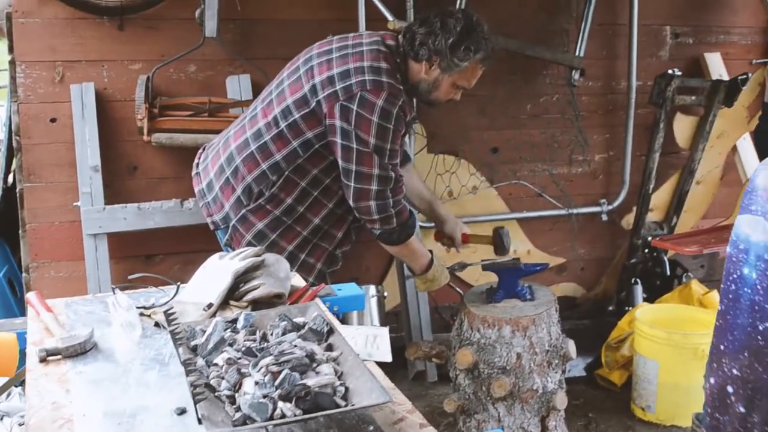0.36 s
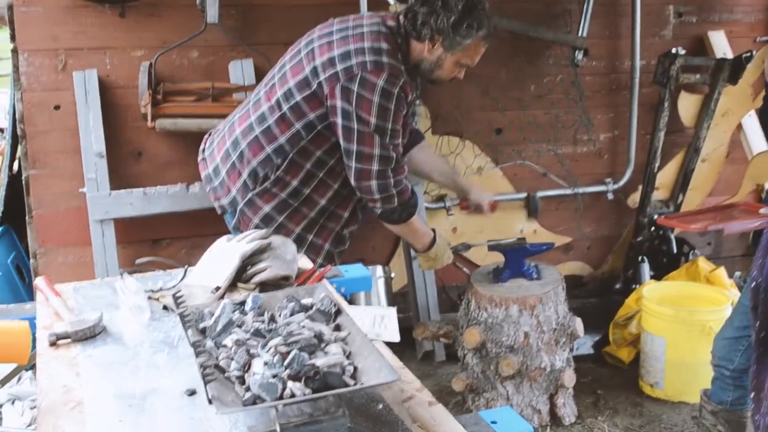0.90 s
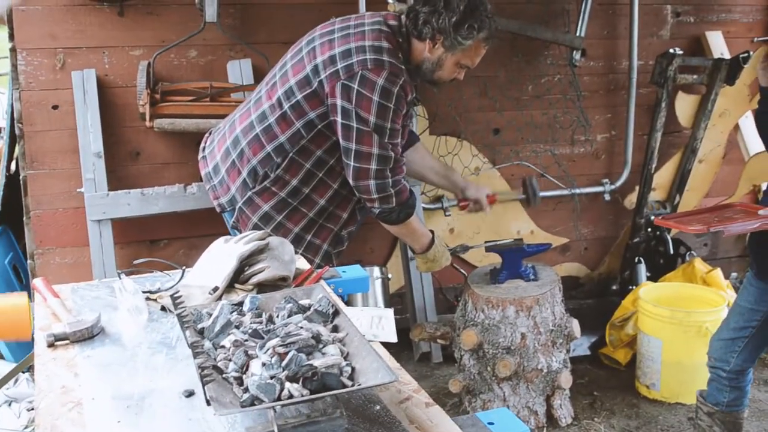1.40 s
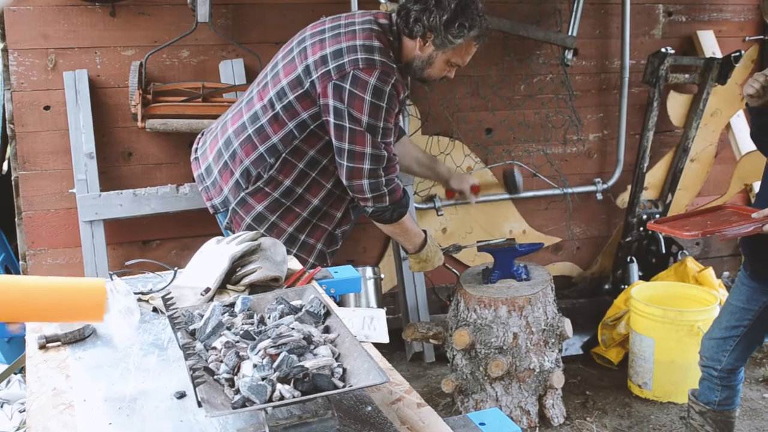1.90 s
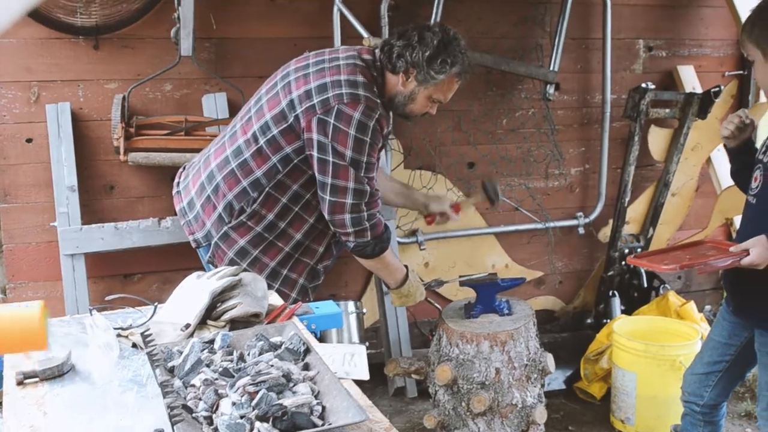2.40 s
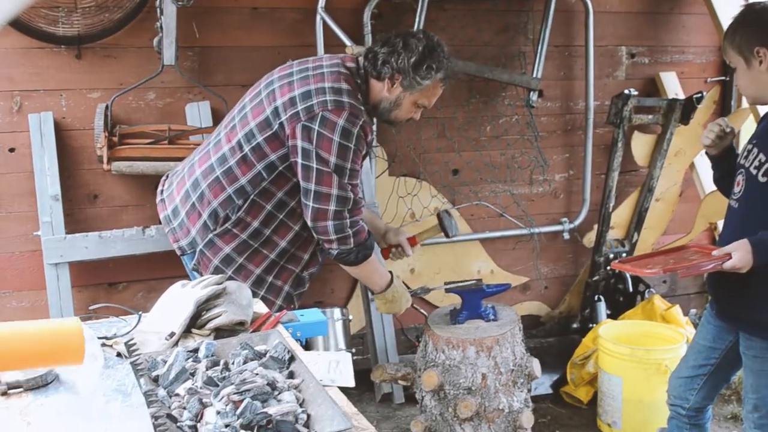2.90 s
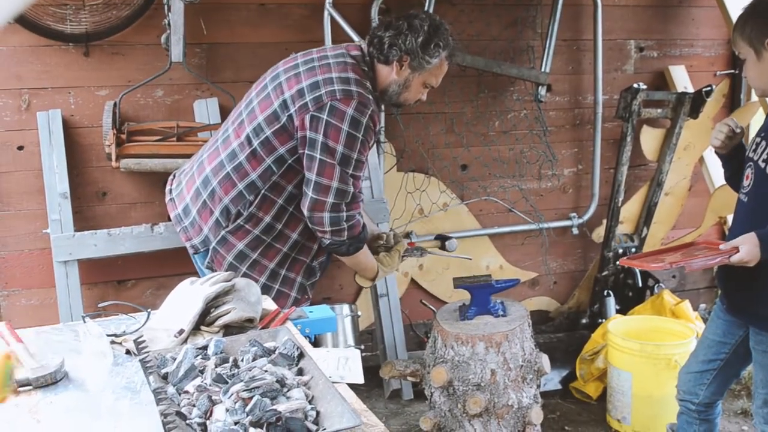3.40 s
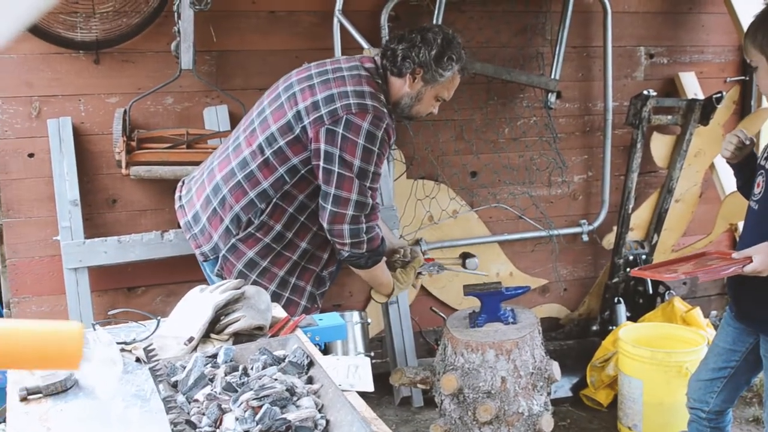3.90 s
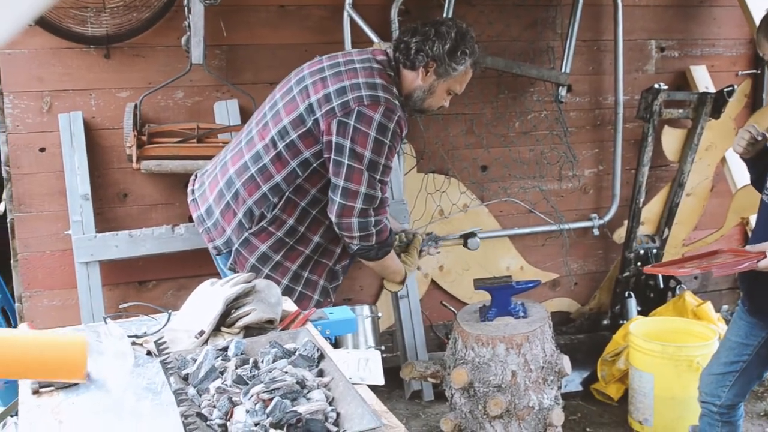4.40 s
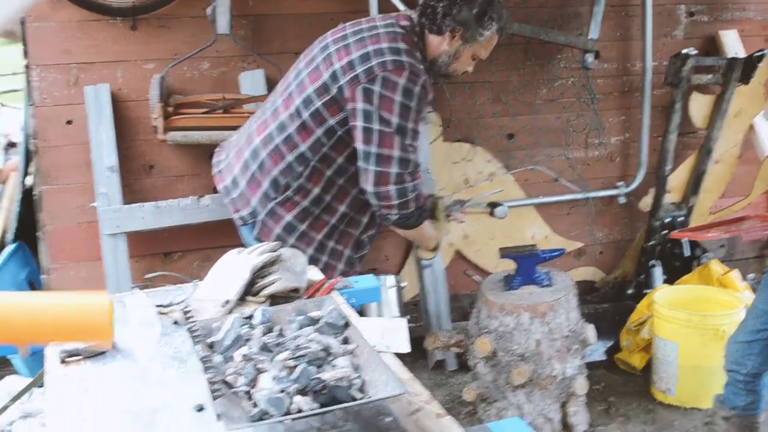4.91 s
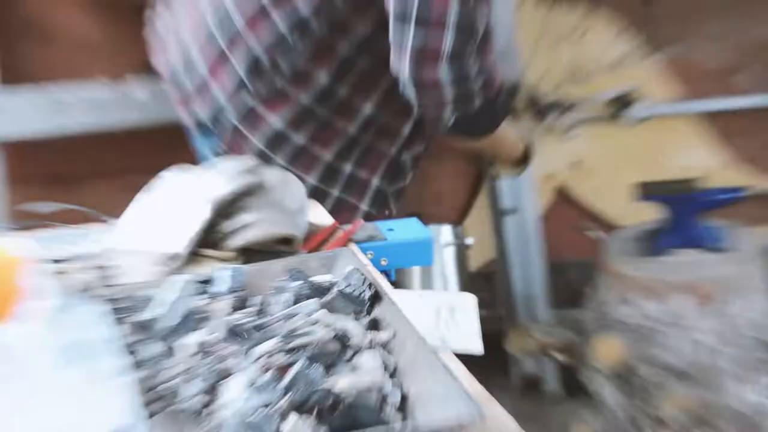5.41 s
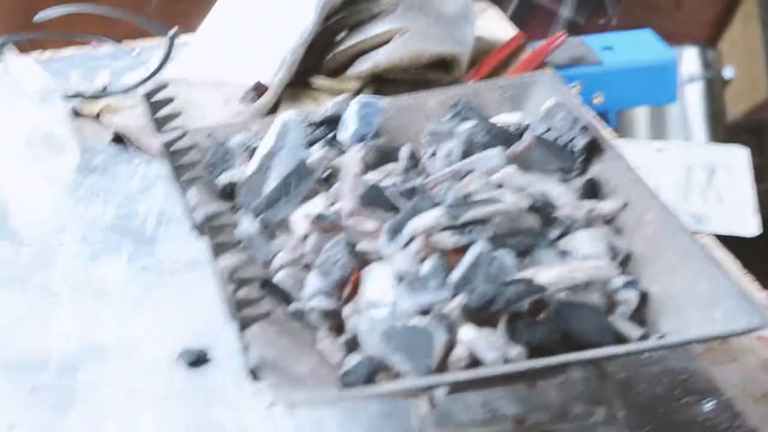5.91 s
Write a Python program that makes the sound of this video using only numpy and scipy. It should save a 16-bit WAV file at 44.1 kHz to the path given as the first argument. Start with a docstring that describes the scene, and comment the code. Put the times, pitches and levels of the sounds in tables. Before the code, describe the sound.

A hand hammer rings hard on a small anvil outdoors, seven steady blows, then hand sawing rasps on with loose wooden board knocks.

```python
"""A hand hammer strikes hot steel on a small anvil on a stump, seven blows from just before the start to 2.7 s:
each is a noise crack over damped modes and a thin wavering ring, and overload is clipped flat.
From the start, near walls scatter the tool sounds, a far building echoes late, and filtered noise makes a faint yard.
From 1.2 s a board knocks with thud, plank note and dry click, its modes shaken by noisy rebounds.
From 1.6 s to the end someone nearby saws it by hand: random tooth clicks and noise give rasp and hiss."""
import sys
import numpy as np
from scipy import signal
from scipy.fft import rfft, irfft
from scipy.io import wavfile
from scipy.ndimage import uniform_filter1d

SR = 44100
rng = np.random.default_rng(int(sys.argv[2]) if len(sys.argv) > 2 else 0)


def digitize_waveform(pressure):
    """Quantize a signal to 16-bit integers and store it at the path in sys.argv[1].

    Rows of a 2-D input are taken as channels; values are limited to [-1, 1].
    """
    field = np.atleast_2d(pressure).T
    bounded = np.clip(field, -1, 1)
    quanta = np.round(bounded * 32767).astype(np.int16)
    wavfile.write(sys.argv[1], SR, quanta)


def invert_db(level):
    """Linear amplitude ratio for a level in decibels (20 dB per decade), elementwise."""
    return 10 ** (np.asarray(level, dtype=float) / 20)


N = 266805  # samples

# Levels in the tables are relative within each layer unless noted.
# Hammer blows; the lowest anvil mode depends on where the face is struck:
# [t/s, force level/dB, crack brightness level/dB, anvil ring level/dB, lowest ring mode level/dB]
HAMMER_BLOWS = [(-.07, 7, -0.5, 1.5, 7.5), (0.4014, 7.5, -1.5, -5, 5), (0.8736, 8, -0.5, -4, -3.5),
                (1.3479, 3.5, 3.5, 6.5, -2), (1.804, 7, 1, -1, -2.5), (2.278, 4.5, 0, 5.5, -13),
                (2.7458, 5.5, -0.5, -4, -8)]
# Steel, stump and hammer, quickly damped modes: [f/Hz, level/dB, t60/s]
BODY_MODES = [(270.7, -21, 0.23), (406, -23, 0.38), (502, -10.5, 0.058), (605, -3.5, 0.037),
              (769.6, -4, 0.047), (900, -4, 0.043), (1059, 1.5, 0.041), (1250, -1, 0.0093), (1237, -9, 0.1),
              (1440, 5, 0.032), (1700, 2.5, 0.035), (1706, -11, 0.017), (1810, -12.5, 0.034),
              (1882, 6.5, 0.037), (1987, -6, 0.025), (2360, -5, 0.03), (2360, 4, 0.015),
              (2625, -14.5, 0.019), (3100, -9.5, 0.01), (3200, -12.5, 0.01)]
# The anvil's own thin ring: [f/Hz, level/dB, t60/s]
ANVIL_MODES = [(4730, -51, 0.79), (5040, -39, 0.27), (5170, -47, 0.28), (6300, -49.5, 0.3),
               (6660, -49, 0.43), (8330, -40.5, 0.15)]

# Near-wall and yard echoes, fading by band: [f/Hz, near level/dB, near t60/s, yard level/dB, yard t60/s]
ECHO_BANDS = [(190, -18.5, 0.55, -24.5, 1.17), (480, -11.5, 0.28, -31.5, 0.62),
              (1000, -17.5, 0.24, -36.5, 0.66), (2025, -13, 0.18, -42, 0.91),
              (4000, -13.5, 0.13, -37.5, 0.87), (7900, -20.5, 0.16, -32.5, 0.14),
              (14000, -21.5, .08, -49, .2)]
NEAR_END_S = 0.089  # the last near wall
FAR_ECHO_S, FAR_ECHO_DB = 0.19, 4  # centre and height of the swell in the yard tail
LOW_CUT_HZ = 196  # bass limit of the tools

# Spectrum of the distant outdoor noise: [f/Hz, level per Hz/dB]
YARD_SPECTRUM = [(100, -69), (170, -0.5), (218, -8), (486, 8), (991, 7.5), (1600, 11.5), (4350, -10.5),
                 (4750, -17.5), (5580, -12), (12000, -16.5), (15600, -52), (22000, -120)]
YARD_DB = -51.5  # rms before its slow swells
# Low rumble over time: [t/s, wind on the microphone level/dB, low thump remnant level/dB]
RUMBLE_LEVELS = [(0.0, -58, -45.5), (.37, -53, -58.5), (2.4, -56, -53.5), (3.12, -55, -55.5),
                 (3.5, -64, -67.5), (4.2, -59, -59.5), (4.6, -62, -69), (5.0, -49.5, -64), (5.6, -52, -62),
                 (6.05, -62, -60.5)]

# Board jolts: [t/s, plank level/dB, thud level/dB, click level/dB, rattle t60/s (held to 0.01-0.2)]
BOARD_KNOCKS = [(1.185, -56, -17, -60, .03), (1.655, -27.5, -41, -39, 0.038),
                (1.733, -24.5, -11, -42, 0.026), (1.88, 1, -3, -6.5, 0.028), (2.064, -21, -45, -31, 0.017),
                (2.113, -17.5, -13.5, -19, 0.04), (2.154, -45, -50, -24, .03), (2.242, 4, -26, -4.5, 0.038),
                (2.561, -1, -52, 2, 0.011), (2.977, -7.5, -50, -20, 0.044), (3.251, -40, -46, -26, 0.064),
                (3.341, -23, -23.5, -40, 0.014), (3.856, -45, -23, -34, .034),
                (3.899, -27, -10.5, -32, 0.036), (3.945, -50, -52, -23, 0.024),
                (4.192, -15.5, -9, -16.5, 0.089), (4.251, -14.5, -8, -18.5, 0.038),
                (4.395, -11.5, -59, -9.5, 0.038), (4.551, -20, -9.5, -28, 0.037),
                (4.591, -43, -14.5, -50, .036), (4.64, -56, -52, -23, 0.033),
                (4.855, -7.5, -33, -15.5, 0.046), (4.891, -26, -47, -36, 0.025),
                (4.923, -62, -18.5, -50, 0.033), (5.228, -21.5, -19, -30, 0.062),
                (5.271, -16, -11.5, -29, 0.017), (5.286, -42, -38, -15.5, 0.19),
                (5.528, -63, -26.5, -55, 0.034), (5.84, -45, -28, -50, 0.04),
                (5.867, -26.5, -20, -29, 0.027), (5.986, -50, -27, -52, .03)]
# Low board modes in the thud: [f/Hz, level/dB, t60/s]
THUD_MODES = [(173, -2, 0.021), (219, 7, 0.015), (310, -7, 0.0033)]
# Board modes in the plank note: [f/Hz, level/dB, t60/s]
PLANK_MODES = [(560, -30.5, 0.021), (670, 2, .03), (704, -0.5, 0.024), (816, 14, 0.021)]
# Board modes in the dry click: [f/Hz, level/dB, t60/s]
CLICK_MODES = [(1114, 7, 0.039), (1300, 11, 0.018), (1605, 17.5, 0.016), (1964, -4.5, .015),
               (2660, 4.5, 0.024), (3075, -8, 0.011), (3700, -51, 0.0049), (6600, -6, 0.0034),
               (11000, -11, 0.0036)]

# Saw strokes, each lasting until the next turn:
# [turn t/s, share of speed left at the turn (0-1, at least 0.02), fastest t/s, hiss level/dB, rasp level/dB]
SAW_STROKES = [(1.6, 0, 1.62, -63, -43.5), (1.7, 0.02, 1.81, -53, -29.5), (1.939, 0.24, 2.025, -47.5, -31),
               (2.102, 0.18, 2.195, -45.5, -27), (2.262, 0.5, 2.367, -52.5, -32.5),
               (2.453, 0.13, 2.523, -44.5, -25.5), (2.623, 0.05, 2.74, -53, -28.5),
               (2.829, 0.17, 2.899, -49.5, -29.5), (3.002, 0.25, 3.105, -49.5, -31.5),
               (3.182, 0.24, 3.289, -52, -29.5), (3.368, 0.32, 3.494, -50, -31),
               (3.559, 0.35, 3.636, -54, -30), (3.708, 0.2, 3.802, -52.5, -33),
               (3.88, 0.1, 3.964, -54, -33), (4.07, .12, 4.173, -43, -27), (4.24, 0.15, 4.34, -50.5, -30),
               (4.418, 0.26, 4.52, -45.5, -30.5), (4.588, 0.29, 4.684, -54.5, -30.5),
               (4.733, 0.38, 4.88, -46, -30), (4.918, 0, 4.99, -50.5, -31), (5.078, 0.07, 5.199, -51, -30),
               (5.272, 0.18, 5.28, -46, -27), (5.458, 0.07, 5.575, -48.5, -28),
               (5.635, 0.16, 5.727, -57, -33.5), (5.83, .15, 5.915, -48.5, -27.5),
               (6.0, 0.23, 6.1, -57, -38.5)]
LAST_TURN_S = 6.16
HISS_DB_PER_DECADE, RASP_DB_PER_DECADE = 31, 16.5  # of blade speed
RASP_LAG_S = 0.0045  # the board answers after the teeth
BITES_PER_S = 4000  # mean density of tooth clicks
# Resonances of blade and board under the teeth: [f/Hz, width/Hz, level/dB]
BOARD_RESONANCES = [(278, 1200, -18.5), (684, 264, -3), (1326, 232, -4.5), (1698, 24, -15.5),
                    (1990, 370, -7), (2990, 990, -11), (4450, 4200, -66)]
# Spectrum of the hissing tooth tips: [f/Hz, level per Hz/dB]
TEETH_SPECTRUM = [(3500, -23), (5000, -30), (6200, 9.5), (7500, 3), (9000, 0.5), (11500, -4), (14500, -17),
                  (16000, -39)]

# Treble step of the whole mix: [f/Hz, level/dB]
TREBLE_STEP = [(5350, 0), (5700, -9), (6200, -6)]


def level(x, db):
    """Scale to an rms level."""
    return x * invert_db(db) / np.sqrt(np.mean(x ** 2))


def colour(x, table):
    """Shape by (f/Hz, level/dB) points joined on a log axis; causal, so nothing sounds ahead of a blow."""
    hz, db = np.transpose(table)
    bins = np.maximum(np.arange(len(x) // 2 + 1) * SR / len(x), 1)
    gain_db = np.interp(np.log(bins), np.log(hz), db)
    # fold the cepstrum forward for minimum phase
    cepstrum = irfft(np.log(invert_db(gain_db)), len(x))
    cepstrum[1:len(x) // 2] *= 2
    cepstrum[len(x) // 2:] = 0
    return irfft(rfft(x) * np.exp(rfft(cepstrum)), len(x))


def curve(rows):
    """Join table columns in time."""
    s, *columns = np.transpose(rows)
    return [np.interp(np.arange(N) / SR, s, c) for c in columns]


def walk(rate):
    """Random levels held 1 / rate s and smoothed twice; spread near 1."""
    k = int(SR / rate)
    held = np.repeat(rng.standard_normal(N // k + 1), k)
    smooth = uniform_filter1d(uniform_filter1d(held, k), k)
    return 4 / 3 * smooth[:N]


def ring(modes, scatter_db, detune):
    """One strike: decaying sines, each excited and tuned a little differently."""
    t = np.arange(SR) / SR
    out = np.zeros(SR)
    for (hz, db, t60), (a, b) in zip(modes, rng.standard_normal((len(modes), 2))):
        span = t[:int(min(1.5 * t60, 1) * SR)]
        decay = invert_db(db + scatter_db * a - 60 * span / t60)
        out[:len(span)] += decay * np.sin(2 * np.pi * hz * (1 + detune * b) * span)
    return out


def add(track, sound, s):
    """Mix a sound in at a time; the track starts one second early."""
    i = int((s + 1) * SR)
    track[i:i + len(sound)] += sound[:len(track) - i]


def hammer():
    """Each blow: a broad crack, the damped modes of steel and stump, and the thin wavering anvil ring."""
    track, t = np.zeros(N + SR), np.arange(SR) / SR
    crack_spectrum = [(300, -10), (1500, 13), (2600, 4), (5000, -14), (15000, -23)]  # f/Hz, level/dB
    for s, force_db, bright_db, ring_db, lowest_db in HAMMER_BLOWS:
        (hz, db, t60), *upper = ANVIL_MODES
        anvil = ring([(hz, db + lowest_db, t60), *upper], scatter_db=2, detune=0.004)
        crack = level(colour(rng.standard_normal(SR), crack_spectrum), 0)
        crack = crack * np.exp(-t / 0.0038)
        waver = 1 + 1.2 * walk(160)[:SR]  # tongs and hot bar touch the anvil unevenly
        body = ring(BODY_MODES, scatter_db=2.5, detune=0.014)
        blow = body + invert_db(bright_db + 16) * crack + invert_db(ring_db) * waver * anvil
        add(track, invert_db(force_db - 7.5) * blow, s)
    return track


def echoes():
    """Direct sound, dense near reflections to the last wall, and a long yard tail swelling at the far building."""
    t = np.arange(int(1.4 * SR)) / SR
    out = np.zeros(len(t))
    near_end = 1 / (1 + np.exp(np.clip((t - NEAR_END_S) / 0.014, -50, 50)))
    near_gate = np.clip(t / 0.002, 0, 1) * near_end
    yard_rise = np.clip(t / 0.036, 0, 1)
    far_swell_db = FAR_ECHO_DB * np.exp(-((t - FAR_ECHO_S) / 0.045) ** 2)
    log_hz = np.log(np.arange(len(t) // 2 + 1) * SR / len(t) + 1)
    centres = np.log([row[0] for row in ECHO_BANDS])
    spectrum = rfft(rng.standard_normal(len(t)))
    clumps = invert_db(2.5 * walk(500)[:len(t)])  # separate surfaces answer in clumps
    for share, (hz, near_db, near_t60, yard_db, yard_t60) in zip(np.eye(len(ECHO_BANDS)), ECHO_BANDS):
        band = irfft(spectrum * np.interp(log_hz, centres, share), len(t))
        near = near_gate * clumps * invert_db(near_db - 60 * t / near_t60)
        tail = yard_rise * invert_db(yard_db + far_swell_db - 60 * t / yard_t60)
        out += band * (near + tail)
    out /= np.sqrt(SR / 100)
    out[0] += 1  # direct sound
    return out


def yard():
    """Coloured noises: slowly swelling outdoors, wind on the microphone, the low dying rumble left by the blows."""
    wind_db, thump_db = curve(RUMBLE_LEVELS)
    far = level(colour(rng.standard_normal(N), YARD_SPECTRUM), YARD_DB) * invert_db(1.5 * walk(5.7))
    gusts = rng.standard_normal(N) * invert_db(4 * walk(25))
    wind = colour(gusts, [(15, -11), (35, -7), (60, -8.5), (110, -44), (400, -79)])
    thump = colour(rng.standard_normal(N), [(50, -52), (80, -4), (150, -13), (260, -31), (600, -92.5)])
    return far + level(wind, -0.5) * invert_db(wind_db) + level(thump, -0.054) * invert_db(thump_db)


def knocks():
    """The board jolts: a thud softened by the push, with rebounds rattling its plank note and dry click."""
    track, t = np.zeros(N + SR), np.arange(SR // 5) / SR
    push = np.hanning(int(0.0001 * SR) + 3)
    for s, plank_db, thud_db, click_db, rattle_t60 in BOARD_KNOCKS:
        rebounds = rng.standard_normal(len(t)) * invert_db(-60 * t / np.clip(rattle_t60, 0.01, 0.2))
        rebounds[0] += 5  # favours a hard first contact
        sound = invert_db(thud_db - 10) * ring(THUD_MODES, scatter_db=6.5, detune=0.047)[:len(t)]
        for modes, db in ((PLANK_MODES, plank_db - 0.5), (CLICK_MODES, click_db + 4.5)):
            strike = ring(modes, scatter_db=2.5, detune=0.05)[:len(t)]
            shaken = signal.fftconvolve(strike, rebounds)[:len(t)]
            sound = sound + invert_db(db) * shaken / np.abs(shaken).max()
        add(track, np.convolve(sound, push / push.sum()), s)
    return track


def strokes():
    """The blade speeds up from each turn and slows to the next; hiss and rasp levels follow its speed."""
    turn, creep, fastest, hiss_db, rasp_db = np.transpose(SAW_STROKES)
    knots = np.append(np.ravel([turn, fastest], "F"), LAST_TURN_S)  # turn, fastest, turn, ...
    levels = []
    for top_db, slope_db, lag in ((hiss_db, HISS_DB_PER_DECADE, 0),
                                  (rasp_db, RASP_DB_PER_DECADE, RASP_LAG_S)):
        t = np.arange(N) / SR - lag
        quarter_swings = np.interp(t, knots, np.arange(len(knots)))
        left = np.clip(np.interp(t, turn, creep), 0.02, 1)
        speed = left + (1 - left) * np.sin(np.pi / 2 * quarter_swings) ** 2
        # pressure starts from near silence just before the first turn
        pressure_db = np.interp(t, np.append(turn[0] - 0.05, fastest), np.append(-90, top_db))
        levels.append(pressure_db + slope_db * np.log10(speed))
    return levels


def saw():
    """Teeth tear fibres in dense uneven clicks that ring blade and board; the tips hiss."""
    hiss_db, rasp_db = strokes()
    bites = (rng.random(N) < BITES_PER_S / SR) * rng.standard_normal(N)
    bites = level(bites * invert_db(1.6 * rng.exponential(size=N)), 0)
    catch = invert_db(2.2 * walk(110))  # groups of teeth catch together
    board = 0
    for hz, width, db in BOARD_RESONANCES:
        # as the blade slides, each resonance is driven now more, now less
        sway = invert_db(3 * walk(60) + 1.2 * walk(12))
        drive = (0.6 * bites + 0.8 * rng.standard_normal(N)) * catch * sway
        resonance = signal.lfilter(*signal.iirpeak(hz, hz / width, SR), drive)
        board = board + invert_db(db) * resonance / np.sqrt(width)
    # wood swallows the treble
    board = signal.sosfilt(signal.butter(6, 5300, fs=SR, output="sos"), board)
    tips = colour((0.046 * bites + rng.standard_normal(N)) * catch ** 0.9, TEETH_SPECTRUM)
    sound = invert_db(rasp_db) * level(board, 0.1) + invert_db(hiss_db) * level(tips, 5.1)
    return np.concatenate([np.zeros(SR), sound])  # tool tracks start one second early


def scene():
    """All tools sound through the same echoes over the yard noise; small objects radiate little bass."""
    near = signal.fftconvolve(hammer() + knocks() + saw(), echoes())[SR:SR + N]
    near = signal.sosfilt(signal.butter(4, LOW_CUT_HZ, "high", fs=SR, output="sos"), near)
    return (near + yard())[None]


def low_pass(x):
    """Removes everything above the highest recorded frequency."""
    return signal.sosfilt(signal.butter(12, 15830, fs=SR, output="sos"), x)


def record(dry):
    """The treble dips above 5.4 kHz, then stays lowered; the input stage clips flat near full scale."""
    heard = colour(dry[0], TREBLE_STEP)[None]
    clipped = np.clip(heard, -0.99, 0.99)
    return low_pass(clipped)


dry = scene()
out = record(dry)
digitize_waveform(out)
```